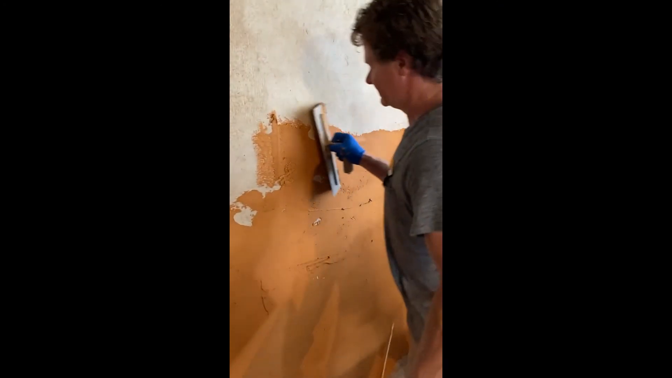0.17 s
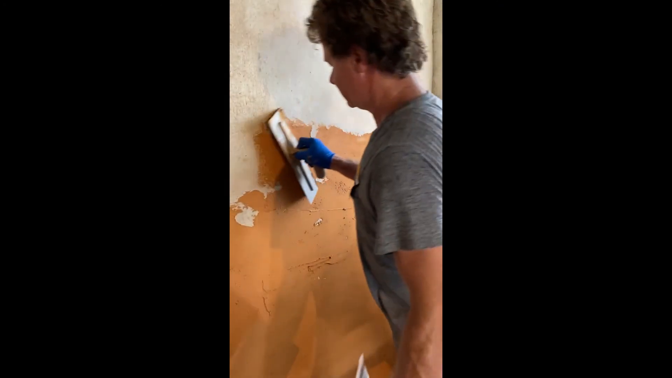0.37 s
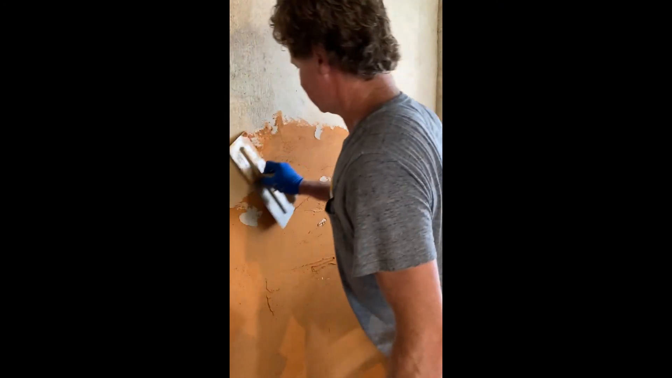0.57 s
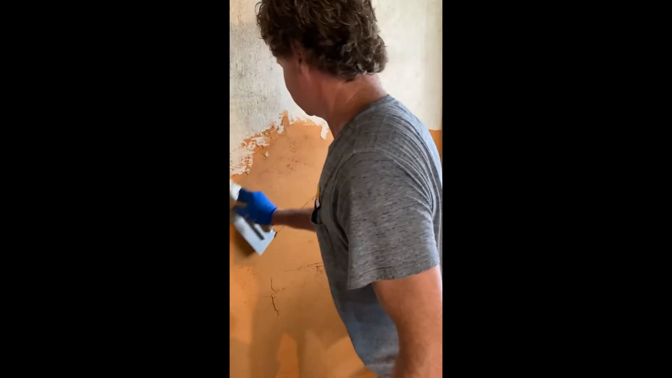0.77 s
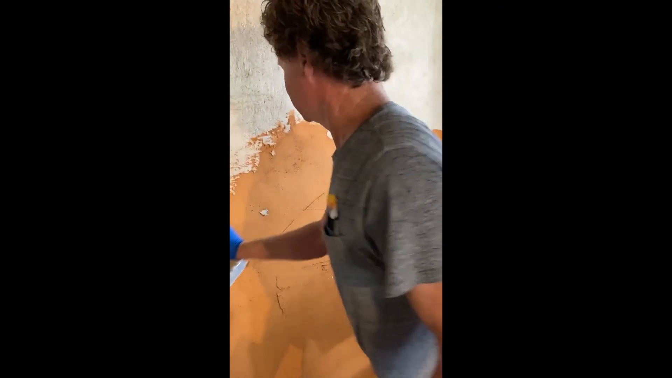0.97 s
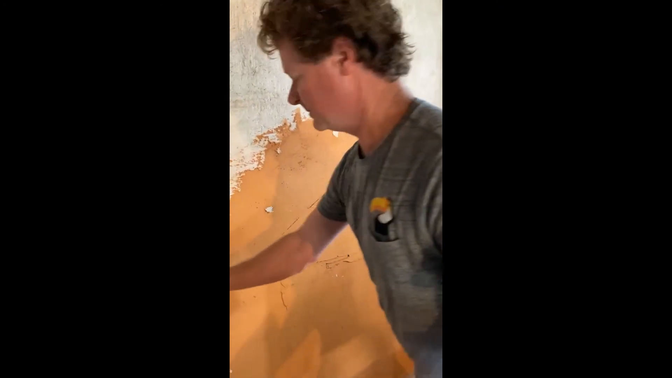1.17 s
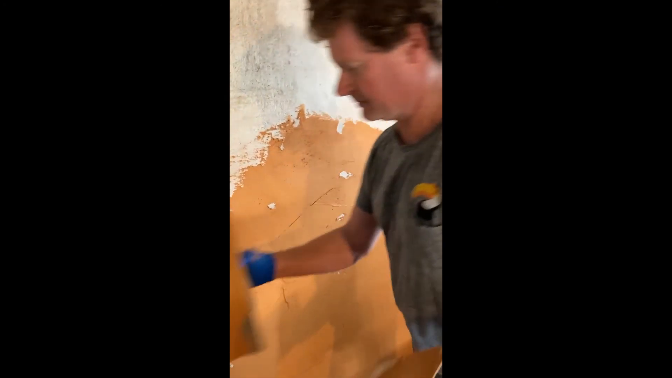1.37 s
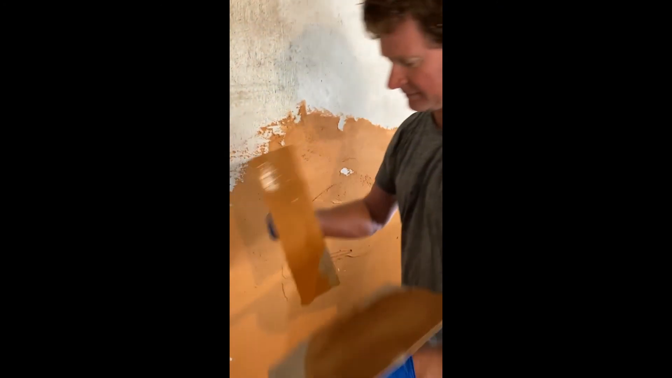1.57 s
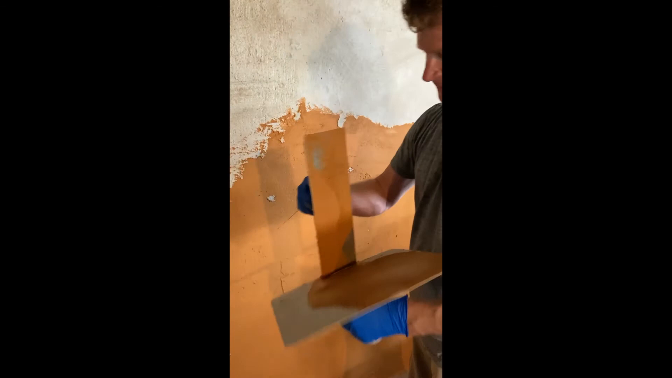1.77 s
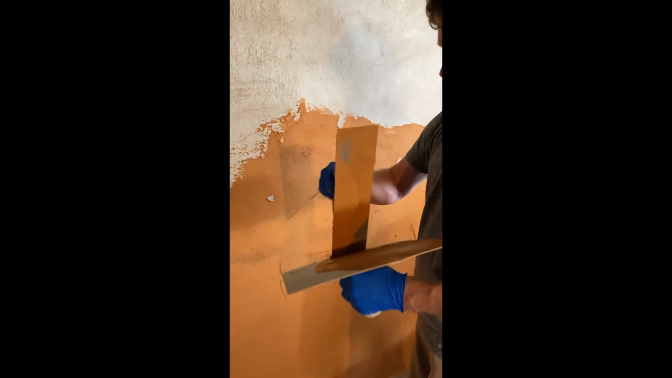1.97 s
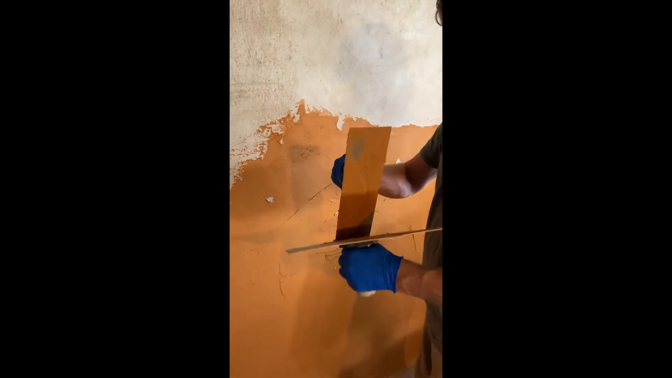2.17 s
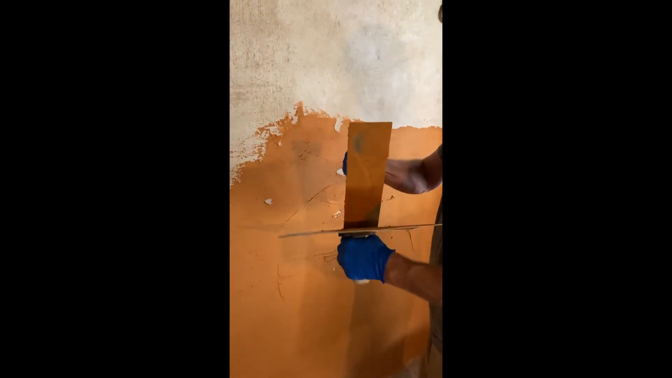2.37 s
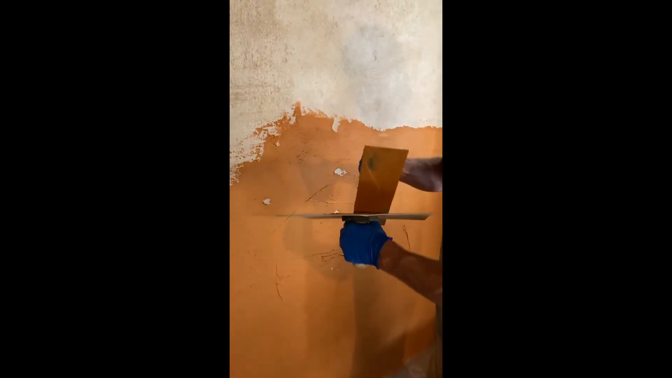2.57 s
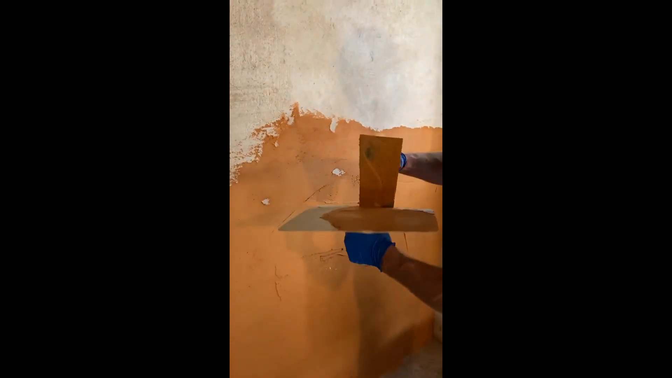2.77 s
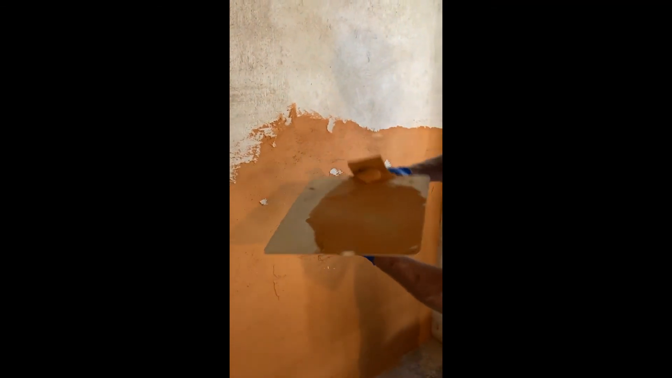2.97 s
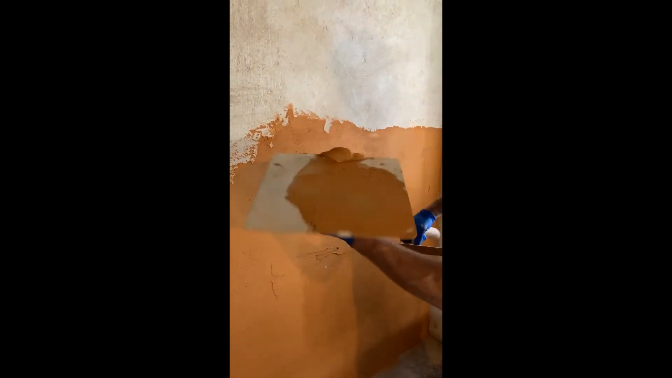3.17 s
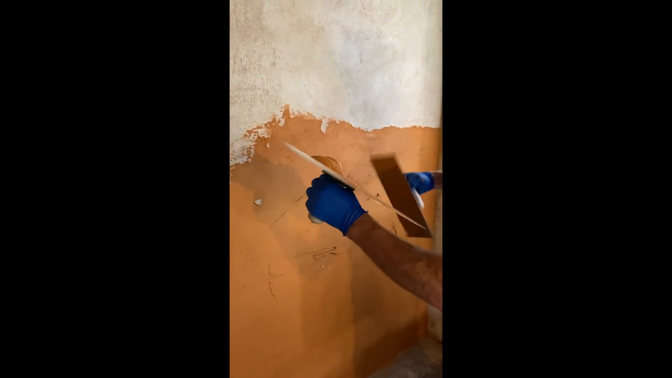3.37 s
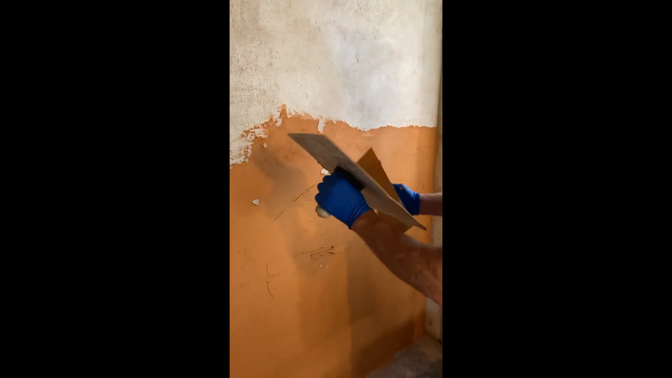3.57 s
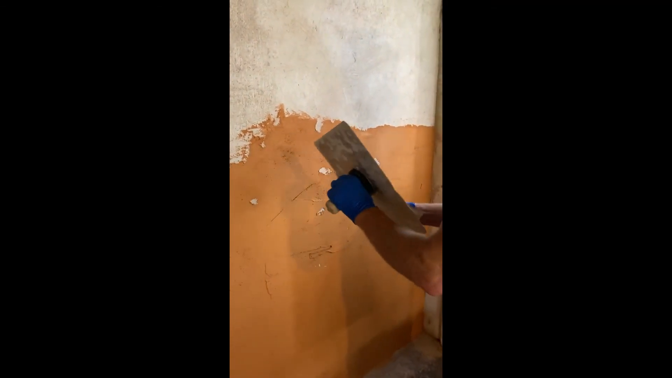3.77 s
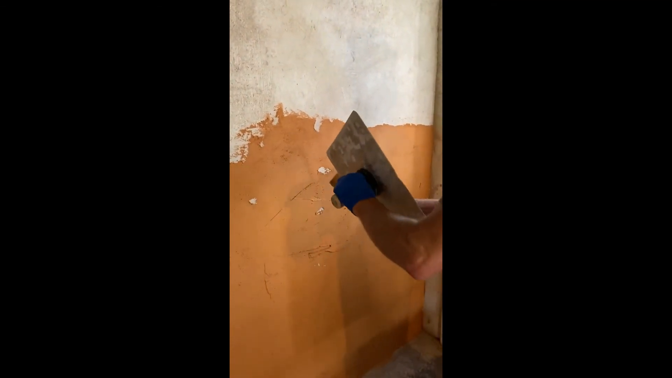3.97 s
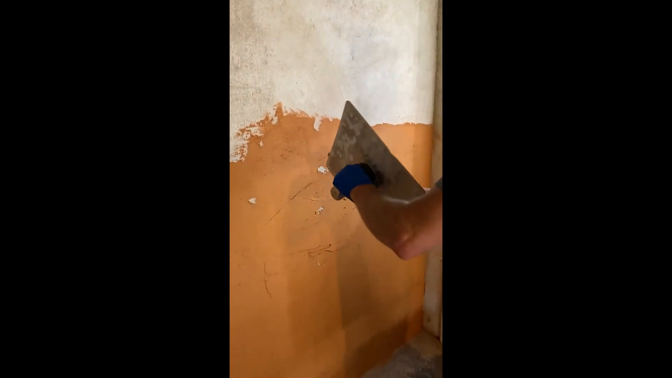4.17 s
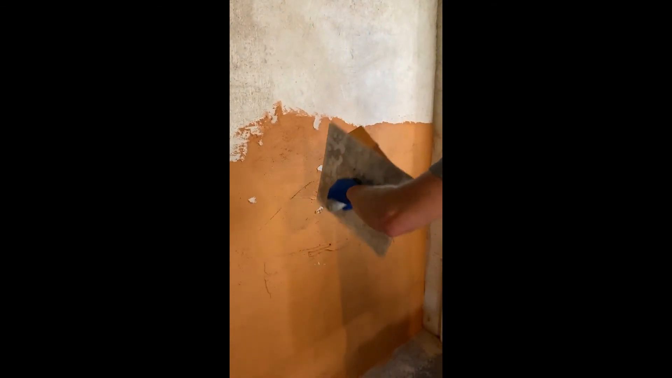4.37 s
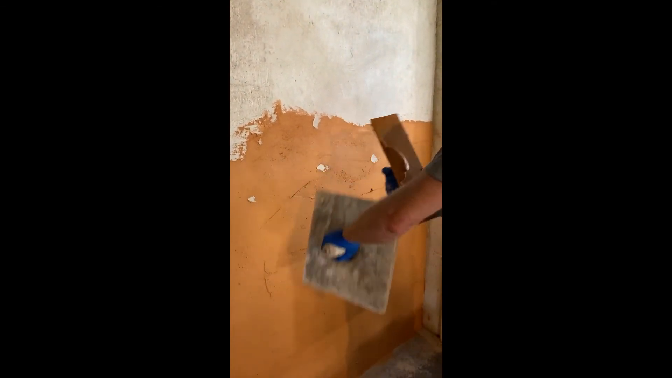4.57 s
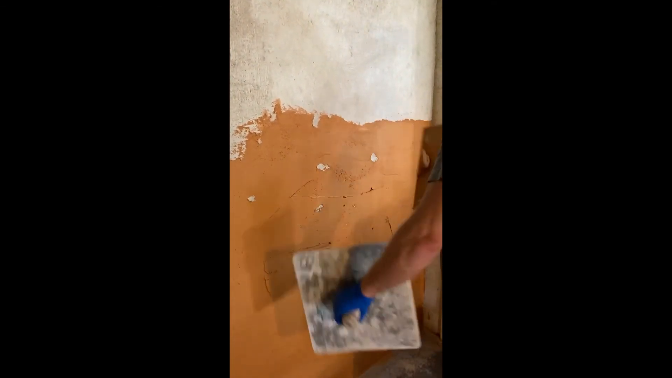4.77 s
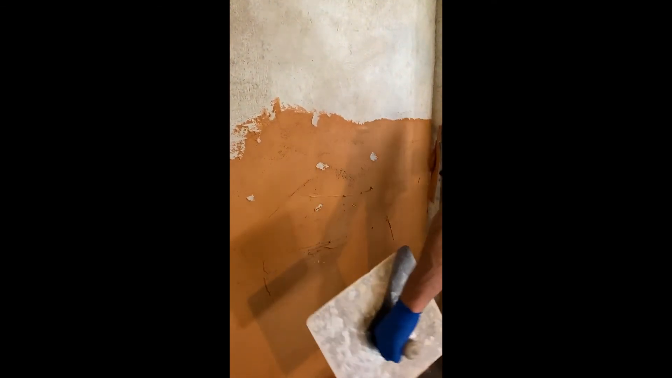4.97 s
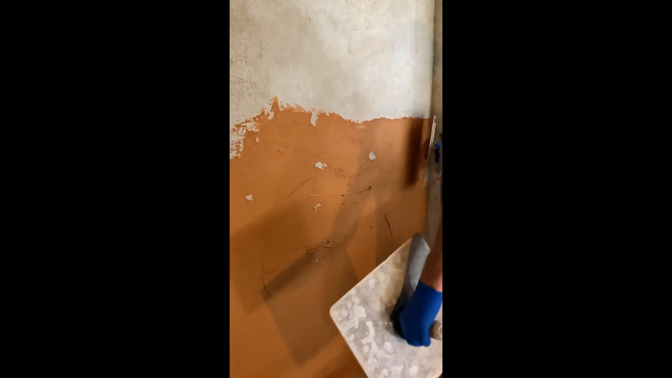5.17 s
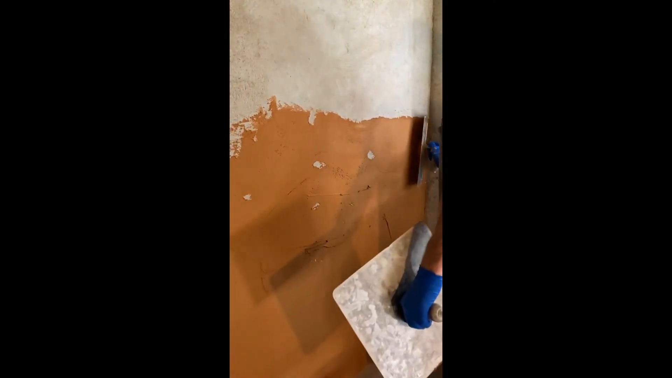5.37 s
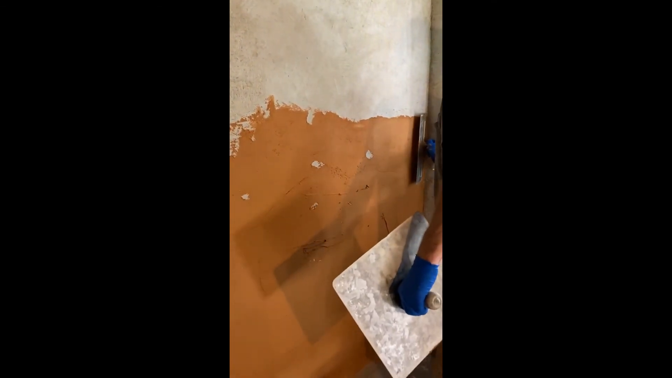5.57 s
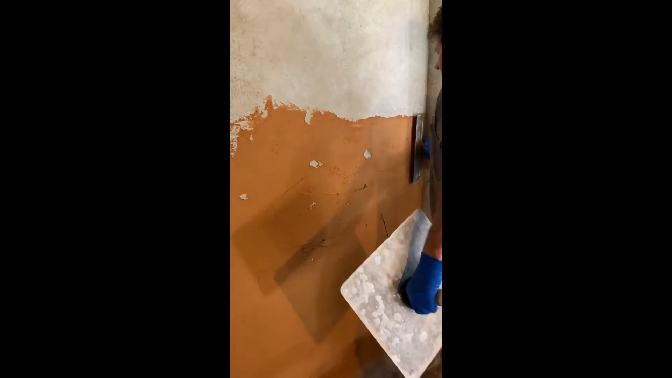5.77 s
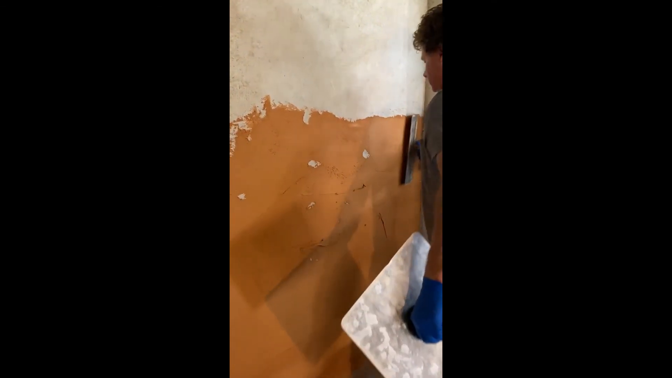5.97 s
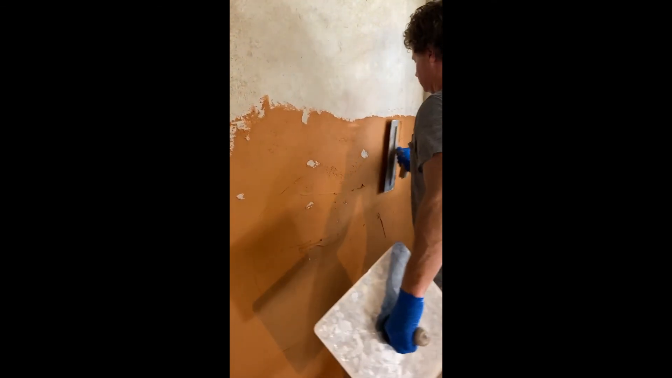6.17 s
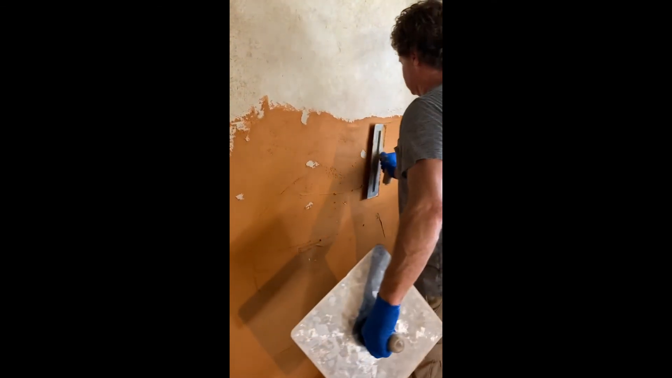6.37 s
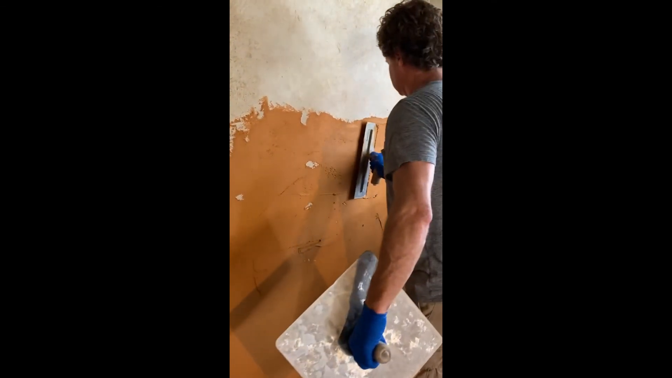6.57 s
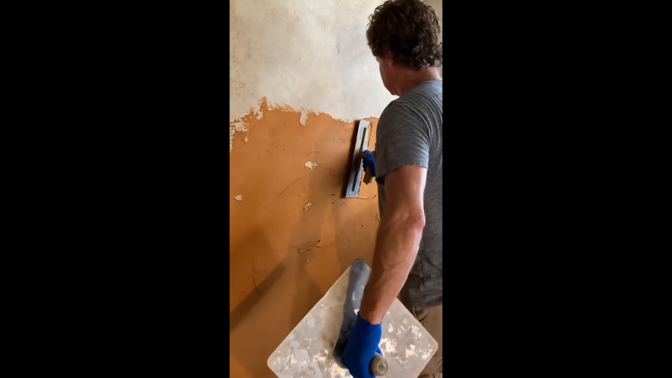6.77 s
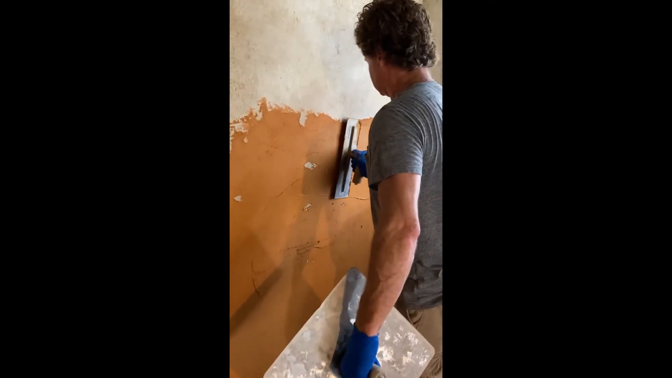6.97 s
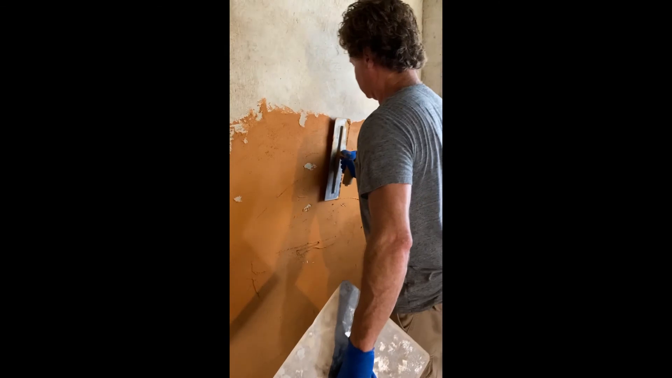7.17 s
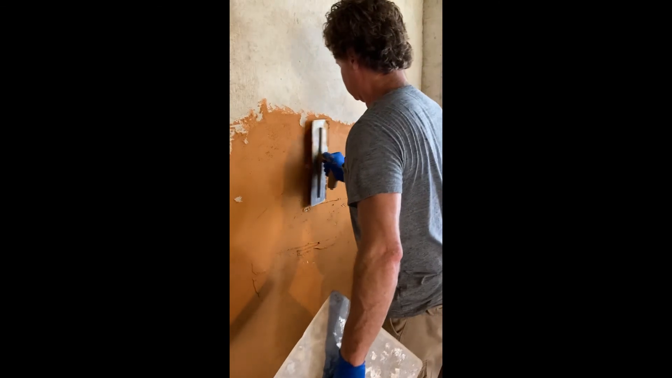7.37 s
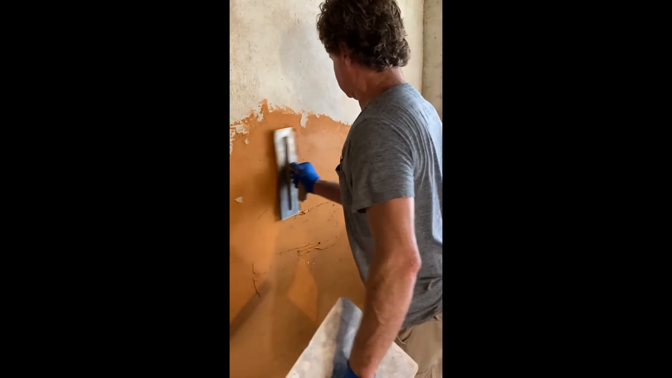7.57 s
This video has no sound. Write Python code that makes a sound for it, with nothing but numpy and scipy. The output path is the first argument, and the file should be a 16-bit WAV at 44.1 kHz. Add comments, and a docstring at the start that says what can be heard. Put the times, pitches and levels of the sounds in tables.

```python
"""In a quiet room, a steel trowel spreads gritty plaster on a wall: sand hisses under the edge, and
the blade drones at a pitch that moves as it flexes. From about 1.8 s it knocks and scrapes a fresh load
off a hawk, the metal plate that holds the plaster. Near 4.6 s the edge lifts and the plate rings on.
From 5.8 s the trowel spreads again. All is heard by a phone whose two microphones face different ways."""
import sys
import numpy as np
from scipy import signal
from scipy.fft import rfft, irfft, next_fast_len
from scipy.io import wavfile
from scipy.ndimage import uniform_filter1d, map_coordinates

SR = 44100
rng = np.random.default_rng(int(sys.argv[2]) if len(sys.argv) > 2 else 0)


def dump_mix(stems):
    """Bounce the given channels to the path in sys.argv[1] as a 16-bit WAV at rate SR."""
    frames = np.atleast_2d(stems).T  # one column per channel
    limited = np.clip(frames, -1, 1)  # hard clip at full scale
    pcm = np.round(limited * 32767).astype(np.int16)
    wavfile.write(sys.argv[1], SR, pcm)


N = 336042

# Levels in the tables are relative: the functions add gains of their own.
# Tone colour of the room's rumble and faint hiss: (frequency [Hz], level [dB])
ROOM_COLOUR = [(15, -39), (25, -11), (84, 0.5), (125, -8), (185, -32), (230, -30), (293, -20), (400, -27),
               (516, -33), (754, -19.5), (887, -32), (2690, -34.5), (8830, -41.5), (14500, -52),
               (16000, -75)]
# Tone colour of the room's drone, also used for thuds: (frequency [Hz], level [dB])
LOW_COLOUR = [(120, -30), (190, -3.5), (300, 3.5), (420, -8.5), (700, -40.5)]
# Level of the background, dipping and returning as the phone suppresses noise:
# (time [s], rumble [dB], drone [dB])
BACKGROUND_LEVELS = [(0.0, -74.5, -56), (0.87, -65.5, -62.5), (1.68, -69.5, -69), (2.3, -63.5, -62),
                     (2.93, -65, -59), (3.82, -69.5, -76.5), (4.1, -65, -57.5), (4.3, -70, -59),
                     (4.42, -82, -60), (4.56, -62, -61), (5.41, -67.5, -67), (6.13, -67.5, -81),
                     (6.85, -74, -91), (7.32, -66, -65), (7.62, -66, -67.5)]
# The room's echo; a ring time is how long a sound takes to fall 60 dB: (frequency [Hz], ring time [s])
ECHO_TIMES = [(200, 0.12), (2000, 0.13), (12000, 0.063)]
# How far the left microphone's wave runs ahead: (frequency [Hz], phase lead [radians])
LEFT_LEAD = [(0, 0), (210, -.1), (360, 2.3), (500, 3), (1000, 2.8), (2000, 1.6), (3000, 2.4), (4100, 1.8),
             (5300, 3.1), (8200, 6.2), (8900, 6.4), (11300, 9.3), (12300, 9.5), (14600, 12.5),
             (16600, 12.6)]
# How alike the microphones sound, apart from that lead: (frequency [Hz], likeness [0-1])
MIC_LIKENESS = [(30, .68), (70, .88), (140, .75), (200, .35), (280, .45), (360, .7), (450, 0.8), (560, .9),
                (820, 0.89), (1150, .7), (2000, 0.42), (4000, .6), (5400, 0.62), (7000, 0.51), (8600, 0.99),
                (10000, 0.66), (11800, 1), (13300, 0.85), (15000, 0.87)]
# Balance of the microphones: (frequency [Hz], left minus right [dB])
MIC_BALANCE = [(100, 0), (140, 2.5), (210, -9.5), (330, -4), (500, 0)]
# A faint rustle in the pause: (time [s], level [dB])
RUSTLE_LEVELS = [(4.85, -110), (4.92, -88), (5.04, -90), (5.08, -105), (5.12, -90), (5.21, -84),
                 (5.29, -89), (5.33, -110)]
# Tone colour of that rustle: (frequency [Hz], level [dB])
RUSTLE_COLOUR = [(3300, -30), (3700, -3), (4100, 0), (4400, -25)]

# The hawk's modes, the notes it rings at. The phase stands for the direction a note goes out in:
# (frequency [Hz], level [dB], free ring time [s], phase [quarter turns])
HAWK_MODES = [(253, -17, 3, 2), (288, -17, 2.5, 2), (323, -23, 2, 2), (382, 6, .75, 1), (417, -12, 2.5, 1),
              (481, -10, .6, 1), (575, -10, .5, 1), (682, -8, .7, 1), (725, -6, .9, 1), (744, 8, 1.7, 1),
              (936, -6, 1, 1), (1002, -10, .45, 1), (1047, -4, .45, 0), (1152, -10, .7, 1),
              (1217, -10, .4, 0), (1313, -4, .6, -1), (1348, -1, .7, -1), (1439, -3, .55, -1),
              (1561, -9, .6, 0), (2385, -13, .5, 0), (2762, -14, .25, -1)]
# One mode is a close pair, so it pulses: (frequency [Hz], pulse rate [1/s], time of a pulse peak [s])
BEATING_PAIR = (744, 2.2, 4.87)
# The freed plate rings, swings and is steadied: (time [s], level [dB])
HAWK_RING_LEVELS = [(4.5, -60), (4.58, -40), (4.66, -38), (4.75, -36), (4.85, -37), (4.99, -37),
                    (5.07, -42), (5.3, -40), (5.4, -46), (5.55, -46), (5.8, -70.5)]
# How hard the edge shakes the plate: (time [s], level [dB])
HAWK_DRIVE = [(0, -36.5), (1.7, -33.5), (1.75, -3), (3.7, -15.5), (3.8, -9), (4.45, -4), (4.55, -36),
              (7.62, -38)]
# Short low thumps and brief flares of the blade's low notes:
# (time [s], pitch [Hz], level [dB], length [s])
LOW_THUMPS = [(.04, 650, -31, .04), (.245, 740, -38, .03), (.345, 640, -40, .03), (.55, 600, -38, .05),
              (1.103, 330, -39, .025), (1.105, 620, -41, .022), (1.13, 480, -48, .025),
              (1.27, 260, -56, .08), (1.759, 215, -40.5, .05), (1.769, 75.6, -46, 0.064),
              (3.822, 310, -28, .042), (3.822, 220, -31, .03), (3.826, 110, -34, .035),
              (3.872, 150, -37, .035), (5.28, 220, -60, .05), (5.91, 200, -36.5, 0.056),
              (5.933, 103.7, -50.5, 0.073)]
# The edge lands: (time [s], level [dB], thud offset [dB], crunch ring time [s])
LANDINGS = [(1.7523, -30, -8, .035), (1.82, -12, -34, .022), (1.827, -19, -30, .03),
            (1.848, -27, -25, .025), (1.863, -26, -24, .03), (1.969, -30.5, -25, .05),
            (2.017, -36, -25, .03), (2.077, -36, -25, .04), (2.137, -41, -25, .04),
            (2.4099, -31, -24.5, .05), (2.47, -28, -28, .04), (2.633, -28, -24, .05),
            (2.741, -25, -34, .05), (3.3409, -53.5, -10, .06), (3.815, -10, -24, .04),
            (3.836, -14, -24, .02), (3.868, -11, -26, .035), (4.053, -26, -30, .04), (5.421, -68, -30, .03),
            (5.572, -45, -30, .05), (5.617, -42, -30, .04), (5.698, -52, -25, .04), (6.601, -47, -30, .04),
            (6.874, -40, -30, .04)]
# Tone colour of a landing's crunch: (frequency [Hz], level [dB])
CRUNCH_COLOUR = [(300, -30), (700, -4), (1600, 3), (3000, -2), (5500, -5), (8500, 5), (11000, 0),
                 (16000, -10)]

# Tone colour of the sand's hiss: (frequency [Hz], level [dB])
GRIT_COLOUR = [(500, -49.5), (1500, -3.5), (2500, 0.5), (4500, 0), (7000, -4), (10000, -5.5), (13000, -2.5),
               (16000, -8)]
# Tone colour of the low boom of rubbing: (frequency [Hz], level [dB])
BOOM_COLOUR = [(110, -27), (170, -10), (220, -3), (290, -3), (360, 3), (450, 0), (560, 2), (720, -24)]
# Tone colour of the edge's sizzle: (frequency [Hz], level [dB])
SIZZLE_COLOUR = [(4000, -42.5), (6000, -13), (7500, -6.5), (8800, -2), (10500, -3.5), (12500, -10),
                 (16000, -19.5)]
# High modes of the edge: (frequency [Hz], level against the sizzle [dB])
EDGE_MODES = [(7693, 0), (7845, -4), (8387, 3), (8650, -4), (8780, -4), (9019, -2), (9290, -3), (9453, 0),
              (9579, 0), (9690, -3), (9774, 2)]
# The blade's upper modes, damped by plaster: (frequency [Hz], width [Hz], level [dB])
UPPER_MODES = [(1111, 45, 6), (1267, 55, 4), (1409, 60, 0), (1563, 55, -2), (1769, 63, -1.5),
               (1972, 100, -5), (2104, 80, -7), (2500, 120, -9), (2950, 220, -10)]
# How strongly the first of those modes sounds: (time [s], gain [dB])
FIRST_MODE_GAIN = [(0, 3), (.06, -4), (.11, 5), (.22, 4), (.3, -3), (.52, 1), (.62, -4), (.8, -3), (.85, 6),
                   (.94, 4), (1.0, -4), (1.09, 3), (1.2, -1), (2.4, 1), (2.7, 1), (3.8, -4), (4.6, -2),
                   (6, 0), (7.62, -4)]
# The blade's lower modes, strong when it lies flat: (frequency [Hz], width [Hz], level [dB])
LOWER_MODES = [(553, 190, -5.5), (677, 95, 0), (812, 49, 0.5), (910, 47, 1), (984, 81, -5)]
# How flat the blade lies: (time [s], gain of the lower modes [dB])
FLATNESS = [(0, 2), (.06, 4), (.13, -1), (.23, 4), (.4, 2), (.47, -2), (.57, 1), (.65, -5), (1.0, -6),
            (1.1, 0), (2.8, -3), (2.92, 2), (3.1, 0), (7.62, 0)]
# Long strokes, one list each; sizzle and blade are offsets from the grit:
# (time [s], grit [dB], sizzle [dB], blade [dB], singing pitch [Hz])
LONG_STROKES = [
    [(0.0, -35, 2.5, 11, 1170), (0.052, -31, 1.5, 7, 1610), (0.116, -36, 2.5, 13, 1270),
     (0.19, -33.5, -1, 6, 1340), (0.302, -32.5, 3.5, 10, 1470), (0.37, -35, 0, 5.5, 1620),
     (0.42, -31, 0.5, 5, 1570), (0.482, -40, 5, 5.5, 1290), (0.56, -32.5, 1, 4, 1270),
     (0.642, -41, 0.5, 6, 1350), (0.7, -36, 5.5, 9, 1280), (0.84, -36, 0.5, 8, 1120),
     (0.978, -36, -1.5, 6, 1550), (1.02, -41, -0.5, 4, 1600)],
    [(0.99, -44, -1, 3.5, 1610), (1.03, -36, -1, 5, 1600), (1.075, -34, 0, 13, 1510),
     (1.12, -37, 0, 14, 1550), (1.198, -62.5, -4.5, 7.5, 1560), (1.5, -76, -2.5, 10.5, 1440),
     (1.62, -79, -2.5, 10, 1440)],
    [(2.742, -53.5, 16, 8.5, 1720), (2.806, -40.5, 7, 3, 1870), (2.85, -37.5, 19.5, 5, 1870),
     (2.92, -37, 18, 5, 1870), (2.96, -41, 18, 3, 1860), (3.002, -38.5, 12.5, -7, 1800),
     (3.036, -34.5, 14.5, -1, 1860), (3.096, -50, 7.5, -1, 1840), (3.18, -68.5, 9, 2.5, 1525),
     (3.326, -88.5, -9.5, 15, 1364)],
    [(3.39, -81.5, 4.5, -3, 1510), (3.446, -70.5, 7, -7, 1690), (3.606, -70, 3, 3, 1550),
     (3.682, -95.5, 0, 2, 1307)],
    [(3.79, -90, 0, 0, 1880), (3.811, -64, 5, -2, 1860), (3.815, -41, 22.5, -1.5, 1810),
     (3.83, -37, 13.5, 6.5, 1810), (3.865, -47, 4.5, 8.5, 1740), (3.868, -39, 17, 2, 1650),
     (3.876, -38.5, 13, 7, 1750), (3.905, -38.5, 11, 10, 1800), (3.934, -38.5, 9, 7, 1740),
     (3.97, -46, 7, 6, 1700), (4.03, -64, 5.5, 2.5, 1770)],
    [(4.01, -63.5, 5.5, 3.5, 1780), (4.05, -58, 6, 2.5, 1770), (4.056, -47, 9, 3, 1750),
     (4.114, -31.5, 13, 4.5, 1740), (4.14, -34, 16, 10, 1650), (4.198, -32, 11, -0.5, 1556),
     (4.226, -38.5, 14.5, 6, 1690), (4.302, -35, 10, -1.5, 1450), (4.39, -29.5, 9.5, -1, 1600),
     (4.43, -32.5, 12.5, 4, 1530), (4.482, -35, 14.5, 2, 1600), (4.554, -37, 10.5, 0, 1590),
     (4.644, -60.5, 3, 7, 1350), (4.8, -85, 10, 16, 1374), (5.15, -104, 5, 18, 1370)],
    [(5.79, -76, 1.5, 1.5, 1665), (5.93, -53.5, 3, 7, 1240), (5.99, -41, 2, 2, 1810),
     (6.04, -40, 5, 10, 1250), (6.08, -38, 0.5, 3, 1300), (6.14, -41, 4, 2.5, 1330),
     (6.19, -38, 3.5, 0.5, 1300), (6.29, -42, 4.5, 1.5, 1400), (6.4, -53, 6.5, 5, 1420),
     (6.49, -53, 5, 11.5, 1430), (6.58, -65, 6, 1.5, 1510), (6.76, -72, 7, -2.5, 1440)],
    [(6.74, -72, 5.5, -1, 1760), (6.81, -64, 6, 3, 1760), (6.86, -65, 8, 2, 1760), (6.89, -55, 8, 0, 1760),
     (6.96, -50, 7.5, -3, 1760), (7.05, -55, 5.5, 0, 1840), (7.09, -48, 5, 1, 1780),
     (7.15, -46, 5, -2, 1780), (7.19, -49.5, 5.5, -4.5, 1780), (7.26, -39.5, -6, 0.5, 1765),
     (7.32, -37.5, -3, 1, 1765), (7.37, -41, 0, 0, 1765), (7.49, -36.5, -3, -2, 1765),
     (7.55, -42.5, 5, 3, 1750), (7.62, -39.5, 0.5, -5.5, 1600)],
]
# How the blade lies in each stroke; linger is the share of the grit's fade that the low sounds skip:
# (singing [dB], lower modes [dB], boom [dB], linger [fraction])
STROKE_POSES = [(-4, -4.5, -22, 0), (3, -10, -11, .6), (-6, -9, -4, .3), (-10, -11, -4, .5), (-3, 1, 0, 0),
                (-2, -9, -7, .4), (-1, -3, -13, -.35), (3, -13, -20, .05)]
# Short dabs and scrapes: (peak time [s], grit [dB], 20 dB rise [s], 20 dB fall [s], sizzle [dB],
# blade [dB], singing pitch [Hz], singing [dB])
SHORT_DABS = [(1.29, -63, .02, .08, 3, 3, 1300, -5), (1.36, -67, .01, .03, 5, 3, 1800, -3),
              (4.92, -86, .04, .06, 12, 0, 1400, -5), (5.21, -88, .03, .05, 8, 0, 1400, -5),
              (5.42, -84, .005, .2, 8, 0, 1400, -5), (1.59, -63, .03, 0.34, -10.5, 3, 1730, -5),
              (1.755, -47.5, .009, .08, 10.5, 8, 1550, -1), (1.812, -57, .012, .03, 12, 8, 1620, -3),
              (1.82, -50, .002, .12, 13, 7, 1630, -3), (1.88, -58, .04, .12, 4, 9, 1750, -3),
              (1.969, -57, .003, .08, 14.5, 4, 1310, 1), (2.048, -55, .04, .06, 9, 9, 1650, -3),
              (2.084, -53, .03, .06, 2.5, 3.5, 1614, 0), (2.157, -45, 0.034, .09, 8, 2, 1800, -4),
              (2.235, -57, .03, .3, 2.5, 3, 1680, -5), (2.411, -60, .002, .12, 8, 12, 1170, 7),
              (2.49, -41, .055, .1, 12.5, 3.5, 1165, 8), (2.633, -54, .003, .05, 14, 3, 1165, 7),
              (2.648, -44.5, 0.024, .07, 12.5, 3, 1165, 8), (2.735, -57.5, .04, 0.06, 13, 5, 1380, -3),
              (3.341, -71.5, .003, 0.08, -15, 11.5, 1530, -3), (5.573, -63.5, .007, 0.38, 2, 2.5, 1390, -8),
              (5.623, -60, .03, .06, 2, 6, 2290, 3), (6.515, -50, .006, .02, 5, 9, 1400, 3)]
# How the blade lies in every dab: (lower modes [dB], boom [dB], linger [fraction])
DAB_POSE = (-7.5, -6.5, 0.58)
# The trowel between contacts:
# (grit [dB], sizzle [dB], blade [dB], singing pitch [Hz], singing [dB], lower modes [dB], boom [dB])
AT_REST = (-99, 0.5, 3.5, 1400, -3, 11, 24)


def amp(db):
    """Turn decibels into a number to multiply by."""
    return 10 ** (np.asarray(db) / 20)


def unit(x):
    """Scale a signal to an average power of 1."""
    return x / np.sqrt(np.mean(x ** 2) + 1e-20)


def along(points, hz):
    """Read between (frequency, value) points on a log frequency scale."""
    point_hz, values = np.transpose(points)
    return np.interp(np.log(hz + 1), np.log(point_hz + 1), values)


def curves(rows):
    """Turn each column after the time into one value per sample."""
    times, *columns = np.transpose(rows)
    return [np.interp(np.arange(N) / SR, times, column) for column in columns]


def wobble(rate, at=None):
    """A smooth curve through `rate` random values a second, read at all samples or those given."""
    times = np.arange(0, N / SR + .002, .001)
    at = np.arange(N) if at is None else at
    values = rng.standard_normal(int(N * rate / SR) + 4)
    return np.interp(at / SR, times, map_coordinates(values, [times * rate]))


def filtered(x, response):
    """Multiply each frequency in x by response(frequency)."""
    size = next_fast_len(N + SR)
    return irfft(rfft(x, size) * response(np.fft.rfftfreq(size, 1 / SR)), size)[..., :N]


def coloured(x, colour):
    """Give x a tone colour from a table, at power 1."""
    return unit(filtered(x, lambda hz: amp(along(colour, hz))))


def resonance(hz, centre, width):
    """One mode: it answers most to frequencies near its centre."""
    return 1j * hz * width / (centre ** 2 - hz ** 2 + 1j * hz * width)


def background():
    """A faint rumble and drone whose levels dip and return."""
    rumble_db, drone_db = curves(BACKGROUND_LEVELS)
    rumble_gain = amp(rumble_db + 1.5 + 1.7 * wobble(5.8) + 2.42 * wobble(15))
    rumble = rumble_gain * coloured(rng.standard_normal((2, N)), ROOM_COLOUR)
    drone = amp(drone_db - 2 + 3 * wobble(8)) * coloured(rng.standard_normal((2, N)), LOW_COLOUR)
    return rumble + drone


def room_echo(x):
    """The walls send the sound back, each frequency dying at its own speed."""
    hz, t, spectrum = signal.stft(rng.standard_normal((2, SR // 2)), SR, nperseg=256)
    fade = amp(-60 * t / along(ECHO_TIMES, hz)[:, None])
    tail = signal.istft(spectrum * fade, SR, nperseg=256)[1]
    return signal.fftconvolve(x, tail / np.linalg.norm(tail[0]), axes=1)[:, :N]


def microphones(pair):
    """Make left and right from a sound's two rows: one shared by both microphones, one scattered."""
    def shares(hz):
        angle = np.arccos(np.clip(along(MIC_LIKENESS, hz), 0, 1)) / 2
        return np.array([np.cos(angle), np.sin(angle)])

    def balance_and_lead(hz):
        side = np.array([[.5], [-.5]])
        lead = np.interp(hz, *np.transpose(LEFT_LEAD))
        return amp(side * along(MIC_BALANCE, hz)) * np.exp(1j * side * lead)

    shared, scattered = filtered(pair, shares)
    return filtered(np.array([shared + scattered, shared - scattered]), balance_and_lead)


def rustle():
    """A faint, thin rustle while the tools hang free."""
    return amp(curves(RUSTLE_LEVELS)[0]) * coloured(rng.standard_normal((2, N)), RUSTLE_COLOUR)


def grains(spread_db):
    """Countless tiny sand hits of uneven size, in a shared row and a scattered row."""
    size = np.minimum(rng.exponential(size=N), 4)
    return unit(rng.standard_normal((2, N)) * amp(spread_db * size))


def hawk_ringing():
    """Once the edge leaves, the plate's modes die away, each wavering as the plate turns."""
    span = np.arange(round(HAWK_RING_LEVELS[0][0] * SR), round(HAWK_RING_LEVELS[-1][0] * SR))
    freed_s = HAWK_RING_LEVELS[1][0]
    t = span / SR - freed_s
    pair_hz, beat_hz, loudest_s = BEATING_PAIR
    beat = np.cos(np.pi * beat_hz * (t + freed_s - loudest_s))
    phases = rng.uniform(0, 2 * np.pi, len(HAWK_MODES))
    out = np.zeros((2, N))
    for (hz, db, ring_s, quarter_turns), phase in zip(HAWK_MODES, phases):
        fading_db = db - 60 * np.maximum(t, 0) / ring_s
        waver_db = 2.5 * wobble(16, span) + 3 * wobble(45, span)
        tone = np.sin(2 * np.pi * hz * t + phase + [[0], [np.pi / 2 * quarter_turns]])
        out[:, span] += (beat if hz == pair_hz else 1) * amp(fading_db + waver_db) * tone
    return amp(curves(HAWK_RING_LEVELS)[0]) * out


def hawk_scraped(force):
    """Scraping shakes the plate, while the edge and the plaster cut its ringing short."""
    def plate(hz):
        response = 0
        for centre, db, ring_s, _ in HAWK_MODES:
            damped_s = .3 * ring_s
            width = np.log(1000) / (np.pi * damped_s)
            response += amp(db) * resonance(hz, centre, width) / np.sqrt(width)
        return response

    shaking = force * amp(curves(HAWK_DRIVE)[0]) * grains(spread_db=3)
    return amp(31) * filtered(shaking, plate)


def low_thumps():
    """Short low thumps and flares of the blade's low notes, each a brief pulse at one pitch."""
    out = np.zeros((2, N))
    for start_s, hz, db, length_s in LOW_THUMPS:
        t = np.arange(round(length_s * SR)) / SR
        first = round(start_s * SR)
        pulse = amp(db) * np.sin(np.pi * t / length_s)
        out[:, first:first + len(t)] += pulse * np.sin(2 * np.pi * hz * t + [[0], [np.pi / 2]])
    return out


def edge_landings(thud_rise_s=.006, thud_ring_s=.1):
    """The edge lands with a quick, bright crunch over a dull thud. Returns the sound and its force."""
    t = np.arange(SR // 2) / SR
    force, thud_gain = np.zeros((2, N + SR))
    for start_s, db, thud_db, ring_s in LANDINGS:
        span = round(start_s * SR) + np.arange(len(t))
        force[span] += amp(db - 12 - 60 * t / ring_s)
        thud_gain[span] += (1 - np.exp(-t / thud_rise_s)) * amp(db + thud_db - 60 * t / thud_ring_s)
    crunch = force[:N] * amp(3) * coloured(grains(spread_db=4), CRUNCH_COLOUR)
    thud = thud_gain[:N] * coloured(grains(spread_db=2.5), LOW_COLOUR)
    return crunch + thud, force[:N]


def edge_sizzle(width_hz=25):
    """Grains under the edge ring its narrow, high modes."""
    def edge(hz):
        modes = sum(amp(db) * resonance(hz, centre, width_hz) for centre, db in EDGE_MODES)
        return amp(along(SIZZLE_COLOUR, hz)) * (1 + modes)

    return unit(filtered(grains(spread_db=3), edge))


def wandering_modes(hz, frames, modes, first_db, fill_hz, fill_width_hz, fill_db):
    """The contact wanders along the edge, shifting each mode's level and pitch, over a broad fill."""
    shape = amp(fill_db) * resonance(hz, fill_hz, fill_width_hz) ** 2  # squared for steeper sides
    for k, (centre, width, db) in enumerate(modes):
        boost_db = 3 * wobble(7, frames) if k else first_db
        shifted_hz = centre * (1 + .012 * wobble(5, frames))
        shape = shape + amp(db + boost_db) * abs(resonance(hz, shifted_hz, width)) ** 2
    return shape / np.sqrt(np.mean(abs(shape) ** 2, axis=0))


def blade_drone(pitch_hz, singing_db, lower_db):
    """Sand rings the blade's upper and lower modes, and a singing note that slides as the steel bends."""
    hz, t, spectrum = signal.stft(grains(spread_db=3.5), SR, nperseg=1024)
    hz = hz[:, None]
    frames = np.minimum((t * SR).astype(int), N - 1)  # middle sample of each short slice of sound
    singing = abs(resonance(hz, pitch_hz[frames], width=65)) ** 2
    upper = wandering_modes(hz, frames, UPPER_MODES, first_db=curves(FIRST_MODE_GAIN)[0][frames],
                            fill_hz=1500, fill_width_hz=1500, fill_db=-9)
    lower = wandering_modes(hz, frames, LOWER_MODES, first_db=3.5 * wobble(7)[frames],
                            fill_hz=780, fill_width_hz=600, fill_db=-12)
    shape = upper + amp(singing_db[frames] + 18.5) * singing + amp(lower_db[frames] + 7) * lower
    return signal.istft(spectrum * shape, SR, nperseg=1024)[1][:, :N]


def steel_shimmer(x, depth_db=3.5, width_bins=2, life_frames=7):
    """The steel's many narrow modes flare and fade at random, colouring x."""
    spectrum = signal.stft(x, nperseg=1024)[2]
    flares = uniform_filter1d(rng.standard_normal(spectrum.shape[1:]), width_bins, axis=0)
    flares = uniform_filter1d(flares, life_frames, axis=1)
    gain = unit(amp(depth_db * unit(flares)))
    return signal.istft(spectrum * gain, nperseg=1024)[1][:, :N]


def contact(grit_db, sizzle_db, blade_db, pitch_hz, singing_db, lower_db, boom_db, linger):
    """The curves of one stroke or dab; with linger above 0 the low sounds fade slower than the grit."""
    held_db = linger * (grit_db.max() - grit_db)
    return np.array(np.broadcast_arrays(grit_db, sizzle_db, blade_db, pitch_hz, singing_db,
                                        lower_db + held_db, boom_db + held_db))


def trowel_controls(silent_db=-150):
    """Blend all strokes and dabs: their powers add, and the stronger one sets the tone colour."""
    t = np.arange(0, N / SR, .001)
    contacts = [np.outer(AT_REST, np.ones(len(t)))]
    for stroke, pose in zip(LONG_STROKES, STROKE_POSES):
        times, levels, *columns = np.transpose(stroke)
        grit_db = np.interp(t, times, levels, left=silent_db, right=silent_db)
        colour = [np.interp(t, times, column) for column in columns]
        contacts.append(contact(grit_db, *colour, *pose))
    for peak_s, db, rise_s, fall_s, *colour in SHORT_DABS:
        grit_db = db - 20 * np.maximum((peak_s - t) / rise_s, (t - peak_s) / fall_s)
        contacts.append(contact(np.maximum(grit_db, silent_db), *colour, *DAB_POSE))
    contacts = np.array(contacts)
    power = amp(2 * contacts[:, :1])
    blend = (power * contacts).sum(0) / power.sum(0)
    blend[0] = 10 * np.log10(power.sum(0)[0])
    return curves(np.vstack([t, blend]).T)


def trowel_strokes():
    """The trowel drags over sand. Returns the rubbing sound and the force that can shake the hawk."""
    grit_db, sizzle_db, blade_db, pitch_hz, singing_db, lower_db, boom_db = trowel_controls()
    drag = amp(grit_db + .77 * wobble(40) + .7 * wobble(150))  # the plaster grabs and lets go
    grit = amp(9.5) * coloured(grains(spread_db=1.5), GRIT_COLOUR)
    sizzle = amp(sizzle_db + 1.5) * edge_sizzle()
    lower_db = lower_db + curves(FLATNESS)[0] + 2 * wobble(14)
    blade_gain = amp(blade_db + 2.5 + 1.5 * wobble(30))
    blade = blade_gain * blade_drone(pitch_hz, singing_db + 1.9 * wobble(16), lower_db - blade_db)
    boom = amp(boom_db + 1 + 3.1 * wobble(15)) * coloured(grains(spread_db=2.5), BOOM_COLOUR)
    return drag * steel_shimmer(grit + sizzle + blade + boom), drag * amp(lower_db)


def scene():
    """The trowel, the hawk and the room, as they reach the two microphones."""
    rubbing, rub_force = trowel_strokes()
    knocks, knock_force = edge_landings()
    trowel = rubbing + knocks + low_thumps()
    hawk = hawk_scraped(rub_force + amp(-11) * knock_force) + hawk_ringing()
    echo = amp(-13) * room_echo(trowel + hawk)
    return microphones(trowel + hawk + echo + background() + rustle())


def record(dry, top_hz=15790, slope_width_hz=20):
    """The phone cuts off the very highest treble."""
    return filtered(dry, lambda hz: (1 - np.tanh((hz - top_hz) / slope_width_hz / 2)) / 2)


dry = scene()
out = record(dry)
dump_mix(out)
```